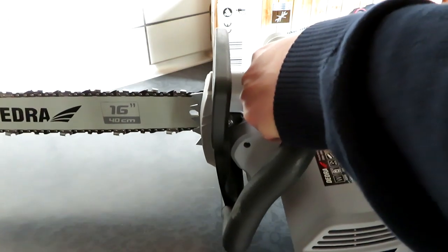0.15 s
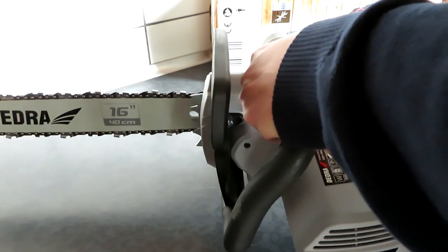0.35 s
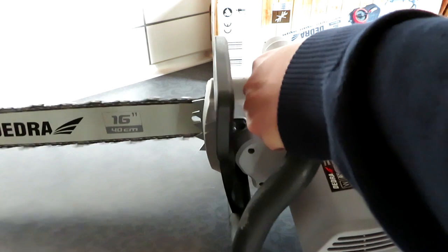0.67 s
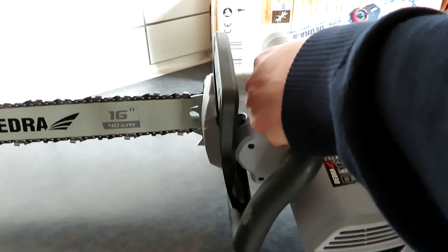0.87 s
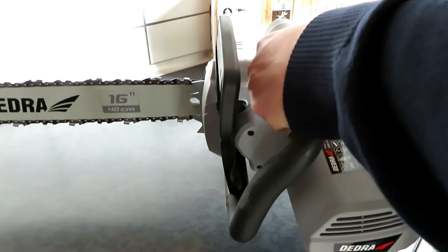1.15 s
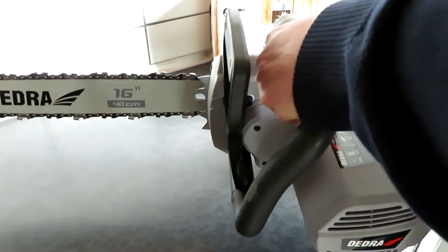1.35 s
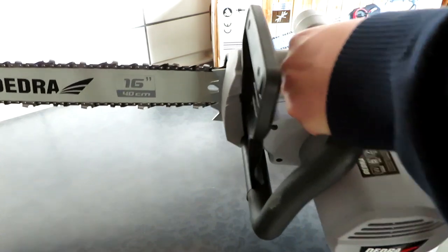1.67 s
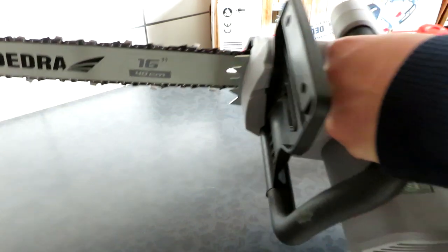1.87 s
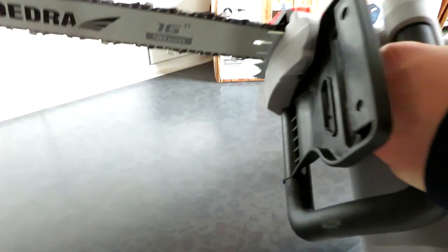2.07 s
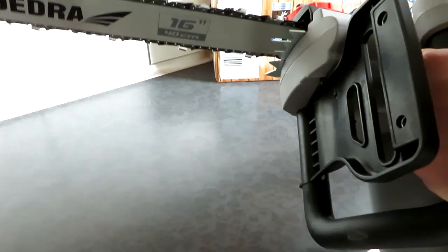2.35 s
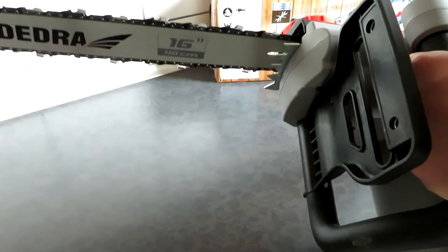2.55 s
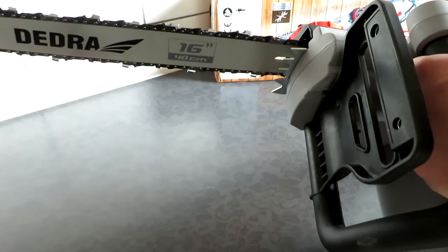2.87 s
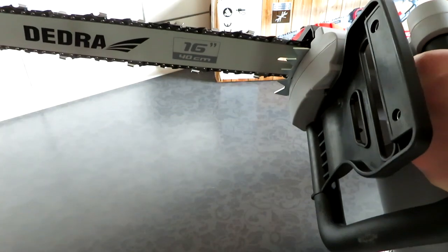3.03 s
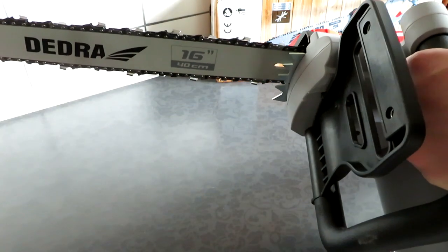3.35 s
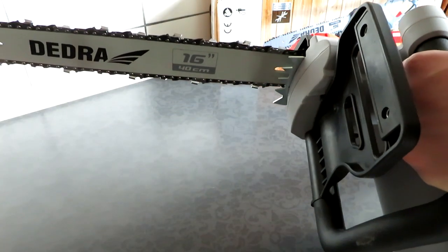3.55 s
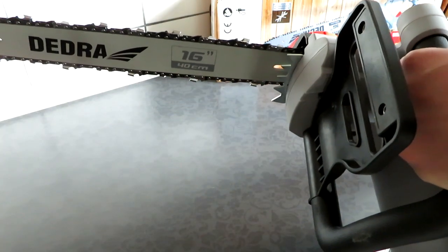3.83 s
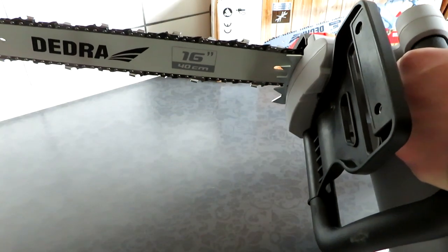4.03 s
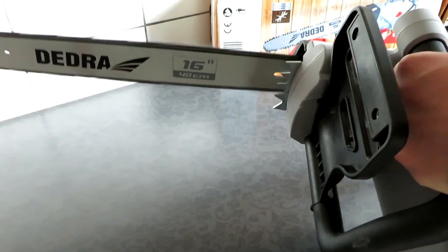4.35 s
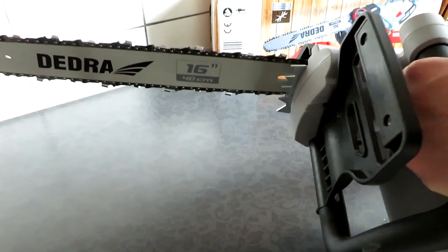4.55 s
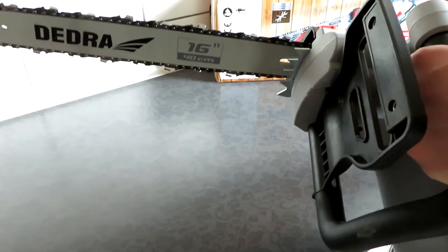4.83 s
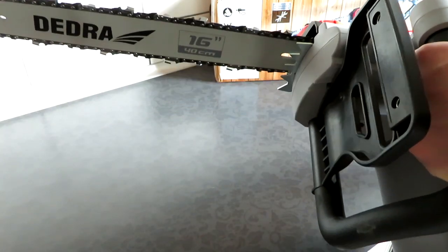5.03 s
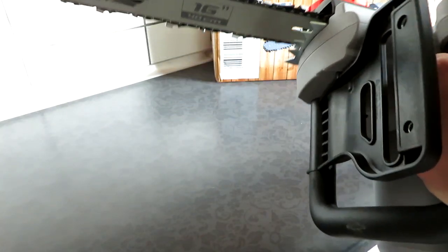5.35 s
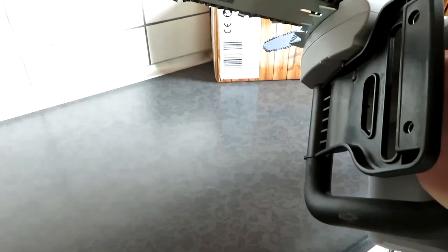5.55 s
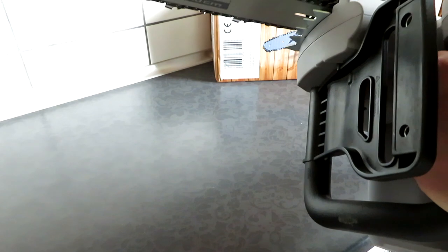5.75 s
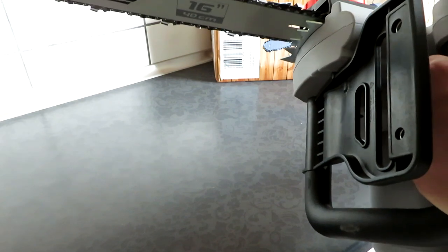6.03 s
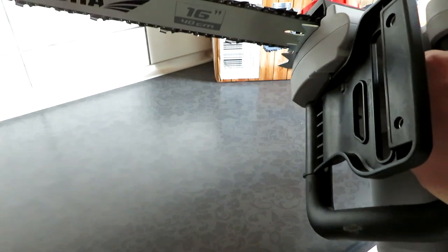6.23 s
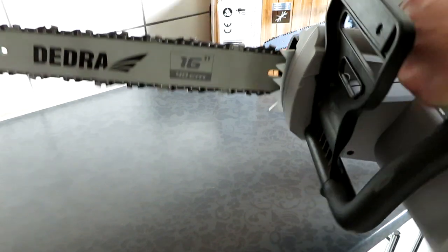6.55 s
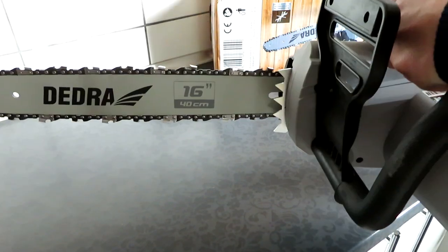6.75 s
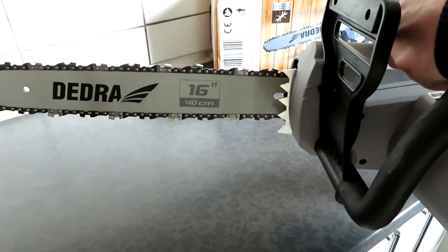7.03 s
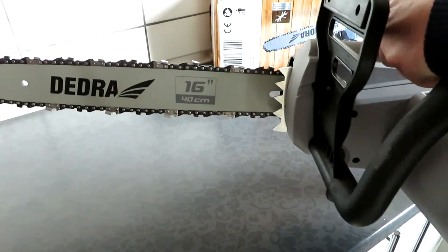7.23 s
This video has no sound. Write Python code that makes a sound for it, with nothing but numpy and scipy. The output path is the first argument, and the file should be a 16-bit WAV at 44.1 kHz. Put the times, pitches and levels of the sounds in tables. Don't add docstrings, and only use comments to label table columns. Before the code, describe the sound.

Close stereo sound of an unloaded electric chainsaw indoors. After a few dry clicks, the motor jolts on with a hollow crack and abrupt roar, is released at once, and spins down for nearly two seconds, whine sliding lower while loose chain clatters and catches. The dull room wash dips under the saw and returns. Creaks and a button snap precede a second identical blip; a faint spring ring, creaks and tiny taps close it, with short tiled reverberation.

```python
import sys
import numpy as np
from scipy import signal
from scipy.fft import rfft, irfft, next_fast_len
from scipy.io import wavfile
from scipy.ndimage import map_coordinates

SR = 44100
rng = np.random.default_rng(int(sys.argv[2]) if len(sys.argv) > 2 else 0)


def digitize_waveform(pressure):
    field = np.atleast_2d(pressure).T
    bounded = np.clip(field, -1, 1)
    quanta = np.round(bounded * 32767).astype(np.int16)
    wavfile.write(sys.argv[1], SR, quanta)


def volts(x):
    e = np.asarray(x, float) / 20
    return 10 ** e


N = 325899
TIME = np.arange(N) / SR

# [f/Hz, level/dB]
RUMBLE = [(8.8, -22), (15, 3.5), (38, 1), (65, -5), (110, 1.5), (140, -22), (240, -120)]
WASH = [(53, -39), (90, -21.5), (136, -13), (165, -13.5), (307, -9.5), (365, -15.5), (483, -10),
        (586, -17.5), (776, -19), (1450, -28.5), (1800, -30.5), (3430, -35.5), (15500, -50.5)]
# [f/Hz, level/dB]
HUM = [(32.3, -55), (96.9, -53), (134.6, -48.5), (199.2, -63), (306.8, -61.5), (398.4, -54), (479.1, -55)]
# [f/Hz, likeness]
CLOSE_ALIKE = [(30, .995), (70, .97), (150, .88), (500, .9), (2000, .9), (5000, .8), (14000, .55)]
WASH_ALIKE = [(60, 0.88), (180, -0.099), (550, -0.46), (1650, -0.5), (4970, -0.2), (15000, -0.55)]
# [centre t/s, half length t/s, level/dB]
DRAUGHTS = [(.95, 0.053, -57), (1.55, 0.12, -66), (5.2, .06, -64), (5.52, 0.049, -35), (5.686, 0.116, -37),
            (6.067, .04, -53), (6.558, .05, -48)]
DUCK_DB, RUMBLE_DUCK_DB = -10, -8.5
DUCK_S, RECOVER_S, EARLY_S = 0.068, 0.29, 0.25

# [t/s, peak level/dB, brightness level/dB, t60/s]
PULLS = [(0.285, -33.5, -10, 0.17), (0.304, -18.5, -26, 0.032), (0.316, -30.5, -8, 0.049),
         (0.435, -32.5, -36, 0.098), (0.525, -16, -37, 0.023), (0.532, -22, -33, 0.04),
         (0.543, -20, -16, 0.044), (0.57, -22, -8, 0.086), (.59, -8, -6, 0.14), (4.366, -22, -3, 0.24)]
LOCK_CLICKS = [
    (4.1315, -6, -25, 0.04),
    (4.149, -27.5, -28, 0.036),
    (4.183, -28, -10, 0.046),
]
RETURNS = [
    (2.553, -26.5, -8, 0.038),
    (2.5615, -11.5, -32, 0.028),
    (2.615, -38, -26, 0.029),
    (6.448, -12.5, -23, 0.047),
]
CREAKS = [(2.7657, -47, -20, 0.035), (2.9556, -45, -17, 0.06), (3.026, -40, -16, 0.28),
          (3.049, -24.5, -31, 0.071), (3.1076, -36.5, -23, 0.069), (6.894, -44.5, -18, 0.06),
          (7.0829, -36, -25, 0.095), (7.1094, -35.5, -30, 0.057), (7.1274, -39, -22, 0.11),
          (7.1663, -36.5, -28, 0.084), (7.2044, -50, -14, 0.05),
          (2.525, -40, -2, .06),
    (6.425, -37, -6, .05),
]
THUMPS = [
    (2.265, -19, -50, 0.089),
    (4.383, 1, -55, .05),
    (6.165, -22, -50, 0.076),
    (6.29, -17, -42, 0.09),
]
CABLE_TAPS = [
    (7.166, -30.5, -50, 0.064),
    (7.202, -24, -50, 0.055),
    (7.235, -29, -50, 0.066),
]
# [f/Hz, width f/Hz, level/dB]
LEVER = [(570, 135, 0.5), (1120, 260, -0.5), (2740, 1900, -15), (4300, 1200, -21)]
LOCK = [(900, 950, -11.5), (1780, 187, 3.5), (2970, 450, -10), (4220, 1600, -23)]
TRIGGER = [(640, 42, 3.5), (1010, 60, 6.5), (1350, 100, 2), (2040, 580, -10.5), (2770, 660, -9),
           (3190, 420, -8), (4020, 240, -17.5)]
GRIP = [(675, 260, -2), (1580, 620, -3), (2520, 940, -8), (3350, 630, -9.5), (4700, 670, -19.5)]
CASING = [(296, 49, 0.5)]
CABLE = [(480, 72, 0)]
# [t/s, f/Hz, level/dB, t60/s]
SPRING = (6.47, 3215, -44, .55)

# [t/s, peak level/dB, thud level/dB, side panel level/dB]
SLAMS = [
    (0.597, 1, -27, 2),
    (4.3722, 4.5, -28, -13),
]
# [contact closes t/s, trigger released t/s, rotor at rest t/s, brake speed/(turns/s), brake rate/(1/s)]
BURSTS = [
    (.596, .742, 2.498, 486, .29),
    (4.372, 4.53, 6.414, 450, .3),
]
SPIN_UP_S, SPIN_UP_SHARE = .035, .5
# [clatter level/dB, air level/dB, growl level/dB]
POWERED_DB = [-37.5, -21, -23.5]
JERK_DB = [37, -19, 6]
JERK_S = 0.019
# [speed/(turns/s), clatter level/dB, air level/dB, growl level/dB]
COASTING = [(4, -52, -83, -50.5), (18.2, -26, -83, -38.5), (33.5, -22, -89, -36), (70, -20, -59.5, -38),
            (102, -21, -41, -36.5), (160, -23.5, -41.5, -29.5), (230, -23, -33.5, -29.5),
            (295, -19, -30, -29)]
# [speed/(turns/s), imbalance level/dB, gear whine level/dB]
TONES = [(4, -90, -59), (40, -77, -48.5), (82.3, -54, -31), (139, -44.5, -30.5), (175, -42, -33),
         (236, -39, -35.5), (270, -29, -35.5)]
# [speed/(turns/s), level/dB]
SLOT_WHISTLE = [(60, -80), (120, -52), (150, -45), (175, -44), (195, -42), (228, -33), (262, -39),
                (280, -58)]
SLOT_ORDER = 38
# [t/s, half length t/s, extra level/dB]
CATCHES = [(1.48, .012, 3.5), (1.565, 0.028, -2), (2.03, .015, 1), (2.062, .01, 4.5), (2.144, 0.0086, 5),
           (2.195, 0.013, 3), (2.245, .012, 5.5), (2.322, 0.014, 7), (2.348, 0.015, 5.5), (5.57, 0.0092, 4),
           (5.74, .015, 4), (5.812, .01, 5), (6.018, 0.013, 2.5), (6.112, 0.015, 8.5), (6.18, 0.013, 2),
           (6.215, .015, 3.5), (6.292, 0.008, 6.5)]
# [multiple of rotor speed], and for each [level/dB]
GEAR_ORDERS = (2, 3, 4, 5, 7, 8, 9, 10, 11, 12, 13, 16, 18, 22, 23)
GEAR_DB = [-8, -8, -7, -2, -6, -10, -1, -5, -5, -10, -9, -9, -1, -11, -11]
# [f/Hz, level/dB]
HOUSING = [(100, -30), (300, -8), (500, -2), (950, -4), (1220, 5), (1500, -1), (1850, -8), (2280, -12),
           (2420, 1), (3100, -3), (3600, -12), (9000, -34)]
# [f/Hz, width f/Hz, level/dB]
BAR = [(590, 40, -11), (840, 35, -5), (910, 35, -3), (1005, 32, -1), (1205, 35, 1), (1345, 40, -2),
       (1660, 32, -4), (2050, 40, -6), (2380, 35, -13), (3040, 70, -3), (3270, 80, -1), (3660, 60, -7),
       (8490, 300, -24)]
# [f/Hz, level/dB per Hz]
RATTLE = [(200, -20), (450, -42), (800, -15), (1300, -2), (1900, 0), (2500, -76), (3200, -2), (4000, -6),
          (5000, -13.5), (15500, -66)]
AIR = [(880, -40), (1500, -30), (2030, 9), (2260, -8), (2800, 6.5), (4180, 1), (6310, -1.5), (8620, -2),
       (13700, -17), (15500, -8)]
GROWL = [(90, -48), (150, -21), (270, -7), (500, -1), (1000, -1), (1600, -10.5), (2500, -5.5), (4000, -22)]
SPARKS = [(4000, -45), (7000, -2), (9000, -1.5), (13000, -2), (15500, -6)]
SPARKS_DB = -20.5
CRAWL_TURNS, CRAWL_HZ = 66, 4000
# [f/Hz, level/dB]
TURNED = [(500, 0.5), (880, -0.5), (1250, 1), (1700, -1.5), (2500, 1.5), (3300, -1), (6000, -0.5)]
TURNED_AT_S = 3.5

# [f/Hz, level/dB]
LEAN = [(60, 1), (180, 0.5), (550, 5), (1650, -2), (4970, -0.5), (15000, 0)]
# [f/Hz, phase/rad]
LEAD = [(60, 0), (300, .3), (800, -.3), (3400, .6), (4200, 0), (8400, 0), (10500, 1.3), (15200, 2.4)]
# [delay t/s, level/dB]
BOUNCES = [
    [(.0011, -16), (.0034, -35.5)],
    [(.0017, -17), (.0046, -27.5)],
]
# [f/Hz, t60/s]
TILES = [(200, 0.24), (1500, 0.35), (5000, 0.34), (14000, 0.13)]
TOP_HZ = 15760


def unit(x):
    return x / np.sqrt(np.mean(x ** 2) + 1e-20)


def along(points, hz):
    f, v = np.transpose(points)
    return np.interp(np.log(hz + 1), np.log(f + 1), v)


def wobble(rate):
    coarse = TIME[::16]
    knots = rng.standard_normal(int(N * rate / SR) + 4)
    return np.interp(TIME, coarse, map_coordinates(knots, [coarse * rate]))


def bumps(rows):
    return sum(h * np.exp(-((TIME - s) / w) ** 2) for s, w, h in rows)


def filtered(x, response):
    m = next_fast_len(N + SR // 2)
    return irfft(rfft(x, m) * response(np.fft.rfftfreq(m, 1 / SR)), m)[..., :N]


def modes(f, table):
    total = 0
    for k, (centre, width, db) in enumerate(table):
        damping = 1j * f * width
        total = total + (-1) ** k * volts(db) * damping / (centre ** 2 - f * f + damping)
    return total


def noise(spectrum):
    return unit(filtered(rng.standard_normal(N), lambda hz: volts(along(spectrum, hz))))


def spread(a, b, alike=CLOSE_ALIKE):
    def mid_side(hz):
        angle = np.arccos(np.clip(along(alike, hz), -1, 1)) / 2
        return np.array([np.cos(angle), np.sin(angle)])
    mid, side = filtered(np.array([a, b]), mid_side)
    return np.array([mid + side, mid - side])


def ducking():
    def after(s, tau):
        return np.exp(-np.clip(TIME - s, 0, None) / tau)
    return sum((1 - after(on, DUCK_S)) * after(rest - EARLY_S, RECOVER_S) for on, _, rest, *_ in BURSTS)


def room_tone():
    duck = ducking()
    stir = volts(-49 + RUMBLE_DUCK_DB * duck) + bumps([(s, w, volts(db)) for s, w, db in DRAUGHTS])
    rumble = stir * volts(1.6 * wobble(12) + 2.4 * wobble(3.03)) * spread(noise(RUMBLE), noise(RUMBLE))
    apart = np.array([[.9], [-.9]])
    hum = 0
    for hz, db in HUM:
        phase = 2 * np.pi * hz * TIME + 1.53 * wobble(8) + apart * (hz / 480) ** 2
        hum = hum + volts(db + 1.5 + 0.63 * wobble(8.1)) * np.sin(phase)
    wash = volts(-43.5 + 0.23 * wobble(11)) * spread(noise(WASH), noise(WASH), WASH_ALIKE)
    wash = wash * volts([[.6], [-.6]])
    return rumble + volts(2 + DUCK_DB * duck) * (wash + hum)


def knocks(events, body, broad_db):
    dull, sharp, t = np.zeros(N + SR), np.zeros(N + SR), np.arange(SR // 4) / SR
    for s, db, bright_db, t60 in events:
        envelope = volts(db - 60 * t / t60) * (1 - np.exp(-t / 0.00045))
        white = rng.standard_normal((2, len(t))) * envelope
        start = round(s * SR)
        dull[start:][:len(t)] += white[0]
        sharp[start:][:len(t)] += volts(bright_db) * white[1]

    def part(hz):
        return modes(hz, body) + volts(broad_db) * modes(hz, [(1850, 2040, 0)]) ** 2

    def tick(hz):
        return modes(hz, [(4900, 6800, 0.008)]) ** 2
    return 4.47 * filtered(dull[:N], part) + filtered(sharp[:N], tick)


def singing_spring():
    s, hz, db, t60 = SPRING
    after = np.clip(TIME - s, 0, None)
    return volts(db - 60 * after / t60) * np.sin(2 * np.pi * hz * after) * (1 - np.exp(-after / 0.029))


def levers():
    out = knocks(PULLS, LEVER, broad_db=-13.5)
    out += knocks(THUMPS, CASING, broad_db=-50)
    out += knocks(RETURNS, TRIGGER, broad_db=-23.5)
    out += knocks(CREAKS, GRIP, broad_db=-16.5)
    out += knocks(LOCK_CLICKS, LOCK, broad_db=-18)
    out += singing_spring()
    return out + knocks(CABLE_TAPS, CABLE, broad_db=-45)


def slams():
    out, t = np.zeros(N + SR), np.arange(SR // 4) / SR
    for s, db, thud_db, panel_db in SLAMS:
        # f/Hz, level/dB, t60/s; the second is the side panel
        panels = [(305.0, -19, 0.51), (618, -0.5 + panel_db, 0.058), (979, -29.0, 0.093),
                  (1306, 2.5, 0.028), (3100, -9, 0.017)]
        ring = sum(volts(level - 60 * t / t60) * np.sin(2 * np.pi * hz * t) for hz, level, t60 in panels)
        crack = 0.18 * volts(-60 * t / 0.02) * rng.standard_normal(len(t))
        thud = volts(thud_db - 1 - 60 * t / 0.21) * np.sin(2 * np.pi * 90 * t)
        out[round(s * SR):][:len(t)] += volts(db - 6.0) * (ring + crack + thud)
    return out[:N]


def rotor():
    speed, levels = np.zeros(N), np.full((6, N), -120.)
    for on, off, rest, brake, rate in BURSTS:
        part = (TIME >= on) & (TIME < rest)
        t = TIME[part]
        coast = brake * np.tan(rate * (rest - np.maximum(t, off)))
        v = coast * (1 - SPIN_UP_SHARE * np.exp((on - t) / SPIN_UP_S))
        speed[part] = v

        def by_speed(rows):
            turns, *columns = np.transpose(rows)
            return [np.interp(v, turns, column) for column in columns]
        powered = np.c_[POWERED_DB] + np.c_[JERK_DB] * np.exp((on - t) / JERK_S)
        noises = np.where(t < off, powered, by_speed(COASTING))
        levels[:, part] = np.r_[noises, by_speed(TONES), by_speed(SLOT_WHISTLE)]
    levels[0] += bumps(CATCHES)
    return speed, levels


def chain(turns, surge, slack, links_per_turn, scatter_db, broad_db):
    links = np.diff(np.floor(turns * links_per_turn + .6 * wobble(150)), prepend=0) > 0
    strength = volts(scatter_db * np.clip(rng.standard_normal(N), -2, 2))
    contact = signal.lfilter([1], [1, -.993], links * strength)
    scrape = surge * (1.2 * unit(contact) + 1) * rng.standard_normal(N)
    ringing = 0
    for part in (BAR[0::3], BAR[1::3], BAR[2::3]):
        def bar(hz):
            soften = (1 + 1j * hz / 4500) ** 2 * (1 + (hz / 10000) ** 6)
            return 1.4 * modes(hz, part) / soften
        fits = slack ** 1.5 * volts(3 * wobble(22))
        ringing = ringing + filtered(fits * scrape, bar)
    return unit(ringing + filtered(scrape, lambda hz: volts(broad_db + along(RATTLE, hz))))


def whines(turns, spin_db, gear_db, slot_db):
    def order(k, rough_db):
        level = volts(3 + rough_db * wobble(9) + 2.5 * wobble(35))
        return level * np.sin(2 * np.pi * k * turns + .5 * wobble(30))

    def housing(hz):
        return volts(along(HOUSING, hz)) * (0.9 + 0.63 * np.abs(modes(hz, BAR)))
    mesh = sum(volts(db) * order(k, 3.3) for k, db in zip(GEAR_ORDERS, GEAR_DB))
    gears = filtered(volts(gear_db) * mesh, housing)
    return gears + volts(spin_db) * order(1, 1.5) + volts(slot_db) * order(SLOT_ORDER, 3.5)


def saw():
    speed, (clatter_db, air_db, growl_db, spin_db, gear_db, slot_db) = rotor()
    turns = np.cumsum(speed) / SR
    whine = whines(turns, spin_db, gear_db, slot_db)
    slack = np.clip(1.1 - speed / 330, .1, 1)
    surge = volts(1.02 * slack * wobble(26))
    live = sum((TIME >= on) & (TIME < off) for on, off, *_ in BURSTS)
    pair = []
    for _ in range(2):
        rattle = chain(turns, surge, slack, links_per_turn=2.4, scatter_db=4, broad_db=-17)
        clatter = volts(clatter_db - 1.15) * rattle
        air = volts(air_db + 2.0 + 0.23 * wobble(36)) * noise(AIR)
        sparks = volts(SPARKS_DB) * live * noise(SPARKS)
        growl = volts(growl_db + 4.5 + 2.4 * wobble(30)) * noise(GROWL)
        pair.append(clatter + air + sparks + growl)
    both = spread(pair[0] + whine, pair[1] + 0.28 * np.roll(whine, 40))
    crisp = np.clip(speed / CRAWL_TURNS, 0, 1) ** 2
    softened = filtered(both, lambda hz: 1 / (1 + (hz / CRAWL_HZ) ** 4))
    both = crisp * both + (1 - crisp) * softened
    first = filtered(both, lambda hz: volts(along(TURNED, hz)))
    second = filtered(both, lambda hz: volts(-along(TURNED, hz)))
    return np.where(TIME < TURNED_AT_S, first, second)


def tiles(x):
    hz, t, z = signal.stft(rng.standard_normal((2, SR // 2)), SR, nperseg=256)
    decay = volts(-60 * t / along(TILES, hz)[:, None])
    tail = signal.istft(z * decay, SR, nperseg=256)[1]
    late = np.pad(x, (200, 0))[None]
    return signal.fftconvolve(late, tail / np.linalg.norm(tail[0]), axes=1)[:, :N]


def near_microphone(x):
    halves = np.array([[.5], [-.5]])

    def path(hz):
        lean = volts(along(LEAN, hz) * halves) * np.exp(1j * along(LEAD, hz) * halves)
        bounce = [1 + sum(volts(db) * np.exp(-2j * np.pi * hz * s) for s, db in side) for side in BOUNCES]
        return lean * np.array(bounce)
    return filtered(x, path)


def scene():
    room = room_tone()
    hits = levers() + slams()
    tool = saw()
    answer = volts(-10.5) * tiles(hits) + volts(-9.5) * tiles(tool.mean(0))
    return 0.83 * near_microphone(tool + hits) + answer + room


def low_pass(x):
    return signal.sosfilt(signal.butter(12, 15650, fs=SR, output="sos"), x)


def record(dry):
    ceiling = dry / (1 + np.abs(dry) ** 8) ** (1 / 8)
    limited = filtered(ceiling, lambda hz: hz < TOP_HZ)
    return low_pass(limited)


dry = scene()
out = record(dry)
digitize_waveform(out)
```